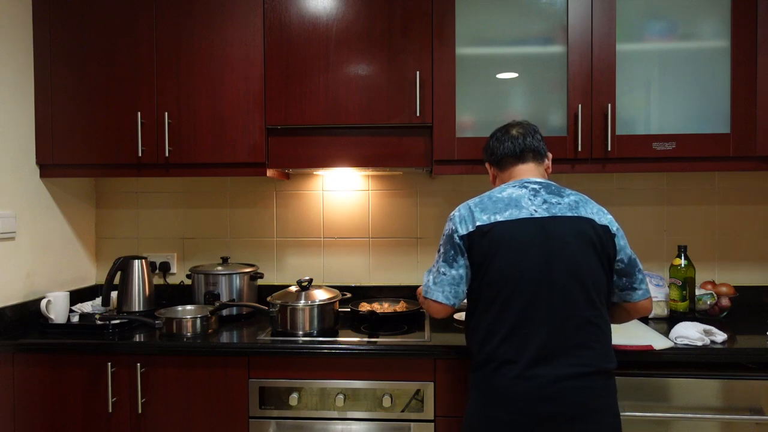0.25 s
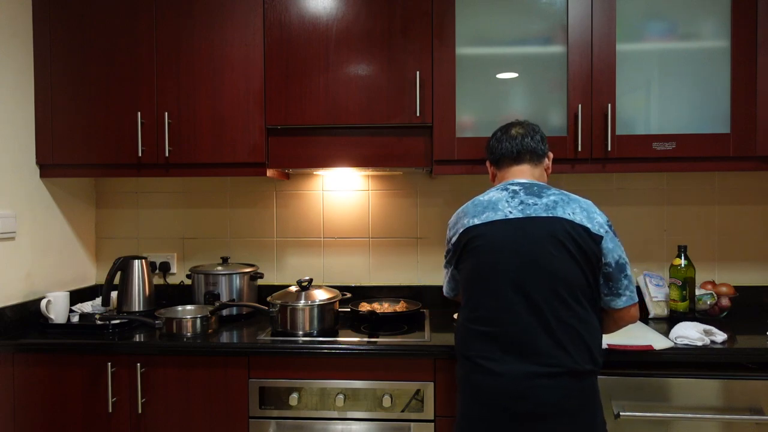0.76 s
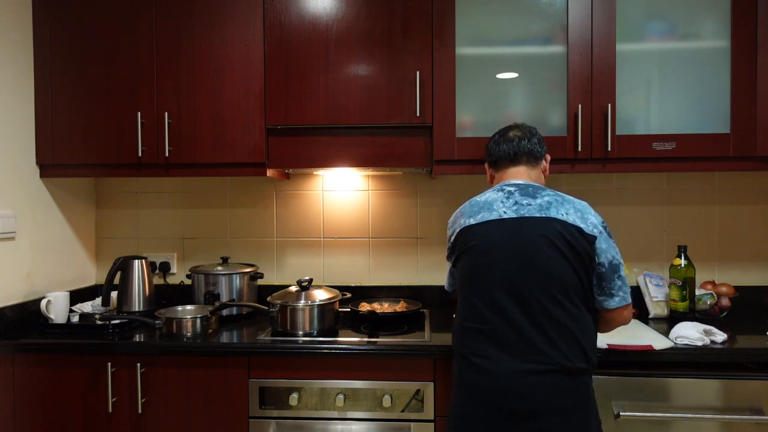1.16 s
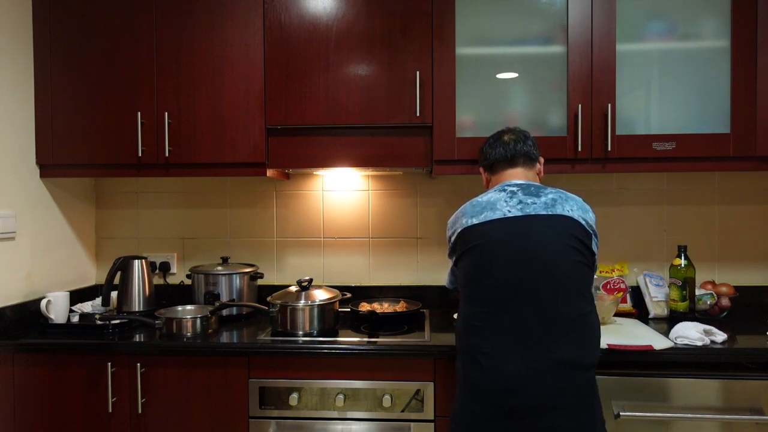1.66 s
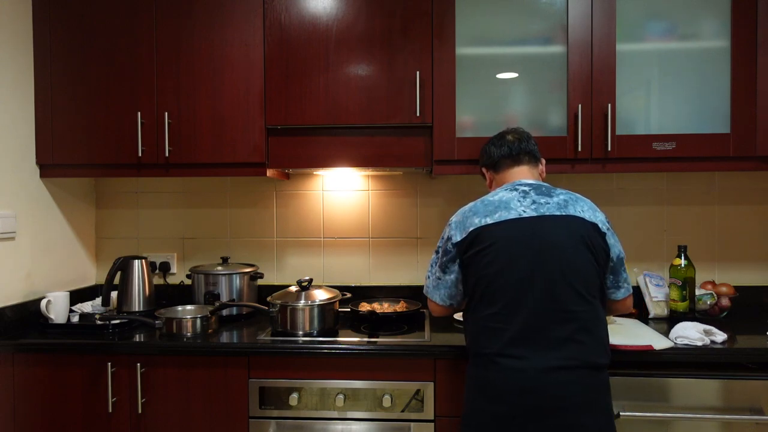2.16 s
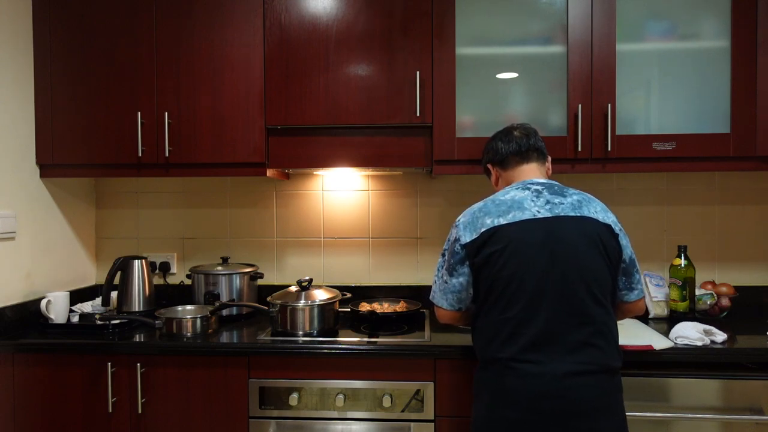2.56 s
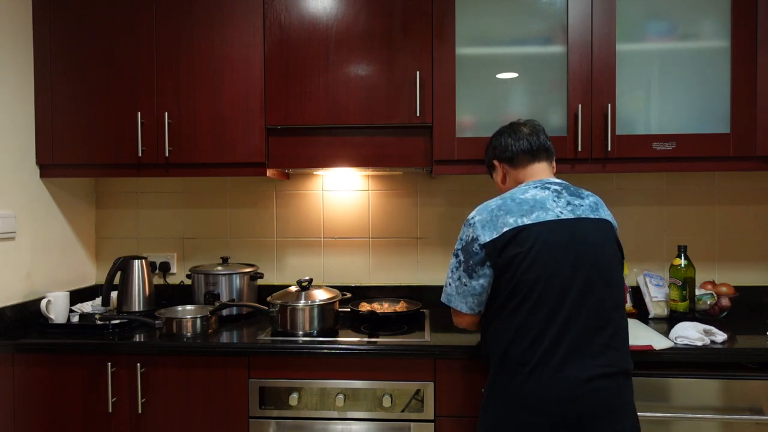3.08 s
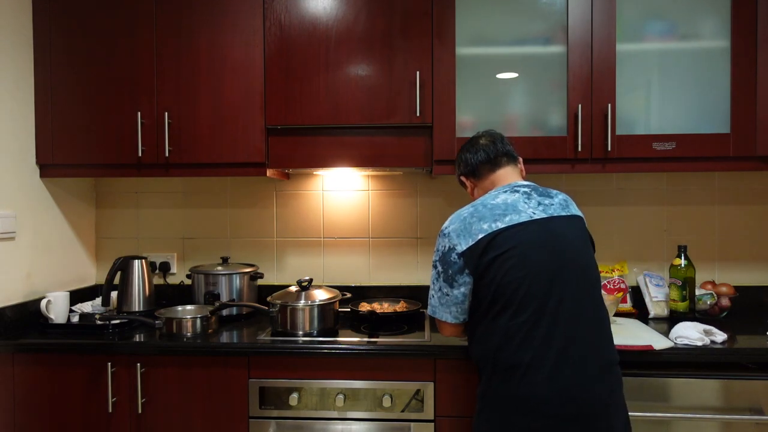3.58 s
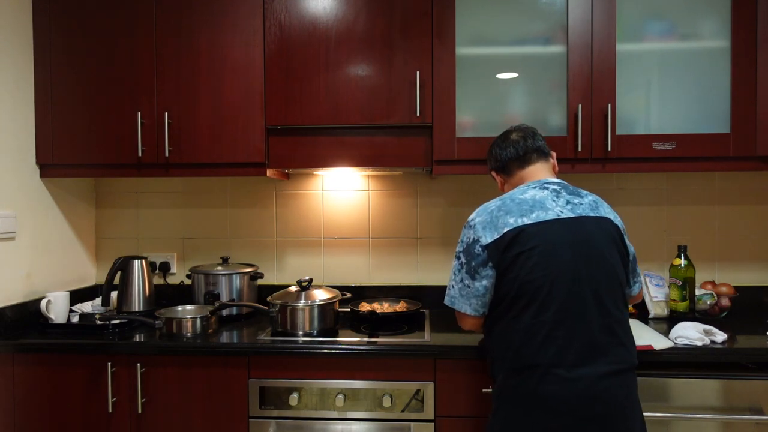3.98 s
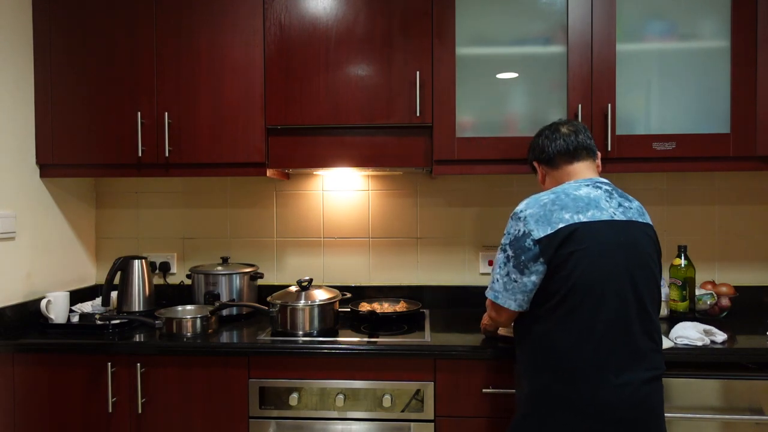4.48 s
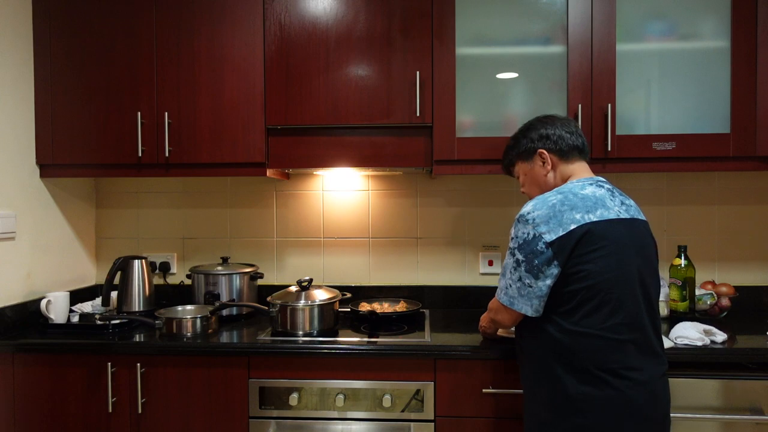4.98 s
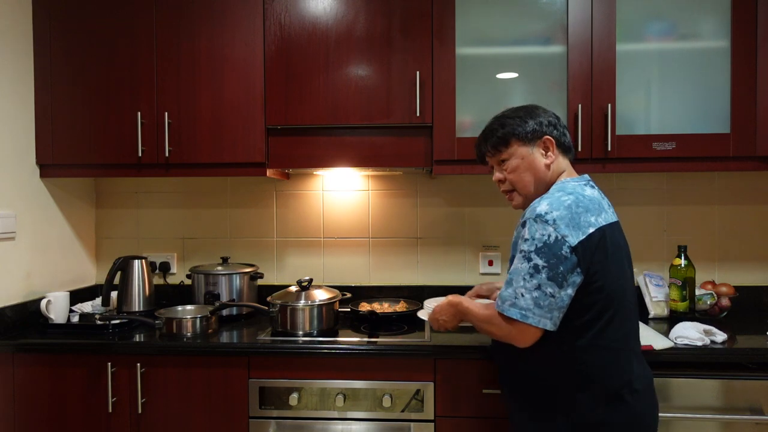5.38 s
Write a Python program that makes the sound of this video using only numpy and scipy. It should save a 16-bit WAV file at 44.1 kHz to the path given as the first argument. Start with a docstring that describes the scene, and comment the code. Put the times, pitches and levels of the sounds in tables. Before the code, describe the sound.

Faint sizzling and a low hum run throughout in a hard, echoing kitchen, heard in stereo and indirectly, through reflections. After soft hand scuffs, a metal lid taps at 0.7 seconds and a pot knocks on a stone counter around 0.9 to 1.1. The pot and lid clank loudly at 1.2 and 1.3 seconds, and the pot clanks hard again at 1.7. Each rings briefly, with echo swelling behind it, and the sizzle dips for a moment afterward. From 2.6 to 2.8 seconds a pan is set down with a softer, quick clatter. A scuff comes near 3.1, then a light clink on a bowl at 3.5. A spoon knocks on the bowl several times between 4.2 and 4.7 seconds, loudest near 4.55. A tiny, low tap follows at 5 seconds, then soft scuffs over the sizzle until about 5.6.

```python
"""Clanks ring out in a hard, echoing kitchen: a lid, a pot and a pan are set down on a stone counter,
then a spoon knocks on a bowl, while food sizzles faintly and hands scuff. Each impact excites the
object's modes: dense, short-lived ones clatter and clear ones ring, all heard by way of the room.
A limiter flattens each loud clank, so the echo swells up behind it; after the long run of clanks
it stays down for a moment and the sizzle sinks."""
import sys
import numpy as np
from scipy import signal
from scipy.fft import rfft, irfft
from scipy.io import wavfile
from scipy.ndimage import uniform_filter1d, minimum_filter1d

SR = 44100
rng = np.random.default_rng(int(sys.argv[2]) if len(sys.argv) > 2 else 0)


def bounce(signal):
    """Save signal as a 16-bit WAV file at the path given by the first command-line argument."""
    frames = np.transpose(np.atleast_2d(signal))
    limited = np.clip(frames, -1, 1)
    pcm = np.round(limited * 32767).astype(np.int16)
    wavfile.write(sys.argv[1], SR, pcm)


N = 248841
SIZE = 49152  # samples in one impact with its echo
T = np.arange(SIZE) / SR
HZ = np.fft.rfftfreq(SIZE, 1 / SR)


def gain_of(db):
    """The decibel scale: 20 dB is a factor of ten in amplitude."""
    return 10 ** (np.asarray(db) / 20)


def rms(x):
    """Effective amplitude: the root of the mean square."""
    return np.sqrt(np.mean(x ** 2) + 1e-20)


def curve_at(points, hz):
    """Interpolation on a logarithmic frequency axis."""
    points_hz, values = np.transpose(points)
    return np.interp(np.log(hz + 1), np.log(points_hz + 1), values)


def decay(t, t60):
    """Exponential damping: the amplitude falls 60 dB in t60 seconds."""
    return np.exp(-np.log(1000) * t / t60)


def minimum_phase(db):
    """Causality: a filter with this gain on HZ and no response before the blow."""
    log_gain = np.log(gain_of(np.r_[db, db[-2:0:-1]]))
    return np.exp(np.conj(signal.hilbert(log_gain)))[:len(db)]


def at_level(spectrum, db):
    """Normalisation: the waveform whose mid channel has this level over its first 50 ms."""
    sound = irfft(spectrum)
    return gain_of(db) * sound / rms(sound[0, :SR // 20])


def add(mix, start_s, sound):
    """Superposition: a sound adds to the mix from start_s on."""
    part = mix[:, max(round(start_s * SR), 0):][:, :SIZE]
    part += sound[:, :part.shape[1]]


# Width of the sound at two microphones: frequency_hz, side_to_mid_db
STEREO_WIDTH = [(100, -20), (250, -20), (500, -15), (1000, -11), (2000, -9.7), (4000, -8.5), (12000, -8.5)]
def mid_side_gains(hz):
    """Spatial coherence: long waves reach both microphones alike, so the bass has little side signal."""
    return gain_of([0 * hz, curve_at(STEREO_WIDTH, hz)])


# Spectrum of the sizzle and room hum: frequency_hz, relative_density_db
SIZZLE_SPECTRUM = [(18, -57), (30, -35), (178, 1.5), (301, -2), (496, -13), (645, -5.5), (931, -11),
                   (1060, -9.5), (1490, -12), (3030, -11.5), (3450, -8.5), (6830, -6.5), (15800, -13.5)]
def sizzle_and_hum(level_db=-54.5, spits_per_s=250, spit_size=6.4, spit_hz=3500):
    """Shot noise: tiny random spits of hot oil add treble to a steady hiss and hum."""
    hz = np.fft.rfftfreq(N, 1 / SR)
    spits = spit_size * rng.laplace(size=(2, N)) * (rng.random(N) < spits_per_s / SR)
    noise = rfft(rng.standard_normal((2, N))) + rfft(spits) * hz / (hz + spit_hz)
    sound = irfft(noise * gain_of(curve_at(SIZZLE_SPECTRUM, hz)) * mid_side_gains(hz), N)
    return sound / rms(sound[0]) * gain_of(level_db)


# Reverberation time of the kitchen: frequency_hz, t60_s
REVERB_TIMES = [(150, .66), (400, .66), (1000, .7), (2700, .72), (6000, .63), (10000, .52), (15000, .42)]
def kitchen(early_boost=0.5, early_t60_s=0.26, build_s=0.0021):
    """Diffuse reverberation: the cook's body hides the direct path, so reflections carry it all."""
    hz, t, bands = signal.stft(rng.standard_normal((2, SIZE)), SR, nperseg=256)
    tail = signal.istft(bands * decay(t, curve_at(REVERB_TIMES, hz)[:, None]), SR)[1][:, :SIZE]
    early = 1 + early_boost * decay(T, early_t60_s)  # the tiles and counter answer first
    build_up = 1 - np.exp(-T / build_s)
    return rfft(tail * early * build_up) * mid_side_gains(HZ)


def contact(t60, density=0.08, impulse=1.47):
    """Impulsive excitation: the spectrum of one sharp touch and a dying chatter of tiny ones."""
    chatter = rng.standard_normal(SIZE) * (rng.random(SIZE) < density) * decay(T, t60)
    return impulse + rfft(chatter) / np.linalg.norm(chatter)


# Soft hand scuffs and, at 5.033 s, the short, low ring of the last light tap on the bowl:
# start_s, level_db, centre_hz, width_octaves, t60_s
LIGHT_TOUCHES = [(0.0, -54.5, 807, 1.3, 0.29), (.484, -54.5, 5030, 0.25, 0.02),
                 (0.586, -59, 5330, 0.58, 0.034), (3.081, -50, 4260, 0.86, 0.47),
                 (4.10, -55, 890, 1.2, 0.48), (4.399, -50, 730, 1.9, 0.11), (5.033, -45, 707, 0.057, 0.069),
                 (5.281, -54, 4140, 1.1, 0.81), (5.543, -53, 2240, 0.87, 0.76)]
def light_touches():
    """Resonance: a chatter of contacts sounds as a scuff in a broad band and rings in a narrow one."""
    mix = np.zeros((2, N))
    for start_s, level_db, centre_hz, octaves, t60 in LIGHT_TOUCHES:
        resonance_db = -20 * np.log10(1 + (np.log2((HZ + 1) / centre_hz) / octaves) ** 2)
        add(mix, start_s, at_level(kitchen() * contact(t60) * minimum_phase(resonance_db), level_db))
    return mix


def mode_spectra(modes, t60, damping_slope=0.17, split=0.01, count=4):
    """Mode splitting: an uneven rim turns each mode into close partners that beat as they decay."""
    hz = np.array(modes)[:, :1]
    t = T[:SIZE // 2]
    offsets = np.linspace(-1, 1, count)[:, None, None] + 0.11 * rng.uniform(-1.2, 1, (count, *hz.shape))
    partner_hz = hz * (1 + split * offsets)
    waves = np.sin(2 * np.pi * (partner_hz * t + rng.random(partner_hz.shape))).sum(0)
    mode_t60 = t60 * (2000 / hz) ** damping_slope  # high modes die sooner
    radiation = 1j * HZ / (1j * HZ + hz / 2)  # thin metal radiates little below its modes
    return radiation * rfft(waves * decay(t, mode_t60), SIZE)


# Clear, ringing modes: pitch_hz, then relative_level_db for each place struck
LID = [(370, -36, -28), (904, -21, -20), (1205, -10, -17), (1367, -36, -14), (1679, -40, -19),
       (1810, -33, -17), (2067, -5, -25), (2137, -26, -13), (2239, -33, -18), (2440, -34, -21),
       (2610, -34, -21), (2939, -15, -15), (3477, -15, -29), (3875, -12, -12), (4231, -25, -36),
       (4425, -39, -25), (5243, -12, -14), (5383, -15, -21), (6879, -17, -23), (7041, -14, -27),
       (7375, -41, -27), (8301, -23, -19), (8871, -21, -24), (8947, -28, -24), (9603, -32, -20),
       (10992, -34, -27), (11531, -28, -28), (12618, -41, -29), (13242, -30, -28), (14240, -37, -37),
       (15220, -34, -44)]
POT = [(425, -26, -26, -27), (581, -18, -20, -28), (872, -18, -22, -14), (1022, -16, -14, -17),
       (1464, -26, -22, -14), (1614, -13, -20, -26), (1690, -19, -12, -29), (1981, -31, -19, -31),
       (2077, -18, -32, -31), (2444, -19, -10, -24), (2594, -18, -22, -18), (2810, -15, -14, -30),
       (3348, -32, -26, -21), (3606, -26, -24, -35), (3692, -37, -39, -18), (4963, -28, -20, -21),
       (5404, -28, -25, -23), (5867, -43, -24, -40), (6158, -32, -21, -33), (7741, -27, -28, -34),
       (8118, -42, -32, -25), (9711, -35, -45, -29), (10766, -31, -54, -29)]
PAN = [(559, -20), (904, -20), (1399, -13), (1658, -17), (2056, -16), (2583, -22), (3197, -21), (4026, -18),
       (5340, -24), (5437, -23), (6093, -27), (7149, -24), (8311, -27), (9625, -32)]
BOWL = [(1453, -33, -32, -20), (1550, -38, -33, -16), (1625, -29, -27, -18), (2508, -36, -17, -12),
        (3391, -3, -9, -15), (3714, -36, -14, -27), (3822, -35, -33, -21), (4844, -26, -26, -31),
        (5221, -14, -30, -26), (5566, -18, -18, -32), (6212, -45, -24, -31), (7256, -40, -35, -25),
        (7913, -17, -28, -23), (8118, -21, -16, -31), (9377, -32, -34, -44), (9560, -30, -47, -34),
        (10346, -20, -19, -27), (10669, -29, -29, -25), (11294, -46, -32, -38), (13124, -25, -23, -34)]
SPOON = [(947, -15), (1421, -13), (1507, -10), (3262, -17), (3391, -13), (5598, -18), (5695, -15)]
# Clatter of dense, short-lived modes: frequency_hz, then relative_density_db for each place struck
LID_BODY = [(95.3, -34.5, -28), (170, -20, -22), (302, -15, -19), (447, -12, -0.5), (650, -0.5, -3),
            (990, 10, 4), (1250, -8.5, -14), (1710, -19.5, 7), (2585, -19, -4), (3430, -3.5, -5),
            (5400, -13, -13), (8000, -25, -54.5), (11800, -41, -26.5), (15300, -35, -40.5)]
POT_BODY = [(90, -39, -58.5, -48), (169, -35.5, -13.5, -17.5), (323, -48.5, -3, -14.5),
            (445, -29, -26, -21), (637, 5, 6, -5), (920, 15.5, 12, 3.5), (1220, 0, 12, 1.5),
            (1820, -0.5, -19, -6.5), (2660, -21.5, -2, -4.5), (3500, -9.5, -3.5, -13),
            (5840, -14.5, -9.5, -14.5), (7950, -17.5, -18.5, -13.5), (11900, -23.5, -29, -21.5),
            (15200, -31, -45.5, -22.5)]
PAN_BODY = [(90, -27.5), (170, -22.5), (300, -12.5), (450, -9.5), (700, -5), (950, -7), (1250, -1.5),
            (1700, 0), (2500, -6), (3600, -8.5), (5500, -12.5), (8000, -14.5), (11000, -25), (15000, -34.5)]
BOWL_BODY = [(89, -35, -49, -47), (170, -27, -21.5, -35), (300, -39, -17.5, -26.5),
             (472, -14.5, -10, -18.5), (707, -18, 3.5, 0), (980, -7, -2, -3), (1140, -6.5, -10.5, -7.5),
             (1740, 6, 7, 1.5), (2660, 1.5, -0.5, -6.5), (3330, 9, 3, 0.5), (5400, -4, -2.5, -6),
             (7900, -5.5, -5.5, -7), (10900, -5, -9.5, -9), (15000, -15, -7.5, -21.5)]
SPOON_BODY = [(90, -46), (300, -70), (650, -51), (950, 15.5), (1150, -22), (1500, 16.5), (1800, 5),
              (2300, -3), (3300, 7), (4500, -5.5), (5700, 7), (8000, -23), (15000, -48)]
# Each vibrating object: modes, clatter, ring_t60_s at 2 kHz
OBJECTS = {"lid": (LID, LID_BODY, 0.056), "pot": (POT, POT_BODY, 0.052), "pan": (PAN, PAN_BODY, 0.092),
           "bowl": (BOWL, BOWL_BODY, 0.071), "spoon": (SPOON, SPOON_BODY, 0.078)}
# Places struck, in the order of the level columns above: ring_over_clatter_db, bass_db
STRIKE_PLACES = {"lid": {"rim": (8, -8), "face": (1, -2)}, "pot": {"base": (0, -15), "wall": (-2, -3),
                 "rim": (-4, -1)}, "pan": {"base": (-6, -2)}, "bowl": {"rim": (7, 2), "wall": (1.5, 2),
                 "base": (-5.5, 3)}, "spoon": {"tip": (-4, -10)}}
# Impacts: start_s, object, place, clatter_level_db, hardness_db (treble gain), chatter_t60_s
IMPACTS = [ (0.728, "lid", "rim", -15, 3, 0.017), (0.895, "pot", "base", -9, 8.5, 0.12),
           (0.988, "pot", "base", -15, 5, 0.016), (1.086, "pot", "base", -20, -20.5, 0.018),
           (1.240, "pot", "wall", 0.5, 9.5, 0.11), (1.333, "lid", "face", 2, 8, 0.14),
           (1.724, "pot", "rim", -0.5, 0, 0.093), (1.785, "pot", "rim", -13, -5, 0.058),
           (2.595, "pan", "base", -20, 3.5, 0.26), (2.621, "pan", "base", -19, -0.5, 0.17),
           (2.680, "pan", "base", -17.5, -7, 0.017), (2.779, "pan", "base", -23, 0, 0.15),
           (3.319, "spoon", "tip", -55.5, 10.5, 0.16), (3.432, "spoon", "tip", -40.5, -20, 0.019),
           (3.518, "bowl", "rim", -26.5, -1.5, .02), (4.178, "bowl", "wall", -14.5, 0.5, 0.15),
           (4.245, "bowl", "wall", -22.5, -11.5, 0.022), (4.440, "bowl", "base", -34.5, -18, 0.21),
           (4.553, "bowl", "base", -6, -3.5, 0.22), (4.640, "bowl", "wall", -19, -3.5, 0.043),
           (5.032, "bowl", "base", -36.5, -8.5, 0.031), ]
def cookware(bass_hz=800, treble_hz=5000, thud_db_per_db=0.19):
    """Modal response to impact: each blow clatters and rings; a hard one is bright, a soft one thuds."""
    mix = np.zeros((2, N))
    spectra = {name: mode_spectra(modes, t60) for name, (modes, _, t60) in OBJECTS.items()}
    powers = {name: abs(spectrum) ** 2 for name, spectrum in spectra.items()}
    bass_shelf = 1 / (1 + (HZ / bass_hz) ** 4)
    treble_shelf = 1 - 1 / (1 + (HZ / treble_hz) ** 3)
    for start_s, name, place, level_db, hardness_db, chatter_t60 in IMPACTS:
        modes, body, _ = OBJECTS[name]
        column = 1 + list(STRIKE_PLACES[name]).index(place)
        ring_db, bass_db = STRIKE_PLACES[name][place]
        path = kitchen() * contact(chatter_t60)
        body_db = curve_at(np.array(body)[:, [0, column]], HZ)
        thud_db = bass_db - thud_db_per_db * hardness_db
        clatter = minimum_phase(body_db + thud_db * bass_shelf + hardness_db * treble_shelf)
        path_gains = np.sqrt(powers[name] @ abs(path[0]) ** 2)
        amplitudes = gain_of(np.array(modes)[:, column]) / path_gains  # mode balance holds on arrival
        ring = (amplitudes * rng.choice([-1, 1], len(modes))) @ spectra[name]
        add(mix, start_s, at_level(path * clatter, level_db) + at_level(path * ring, level_db + ring_db))
    return mix


def scene():
    """Mid-side stereo: the sources add, then sum and difference give left and right."""
    mid, side = cookware() + light_touches() + sizzle_and_hum()
    return np.array([mid + side, mid - side])


def limiter(sound, threshold_db=-17, ratio=4.73, release_db_per_s=63.5,
            memory_s=1.148, hold_share=1.24, hold_max_db=9.5, overshoot=0.38, settle_s=0.041):
    """Compression: the gain drops at once, recovers steadily and stays partly down after long overload."""
    power = abs(uniform_filter1d((sound ** 2).mean(0), size=128))
    needed_db = np.maximum(10 * np.log10(power + 1e-12) - threshold_db, 0) * (1 - 1 / ratio)
    t = np.arange(N) / SR
    release_db = t * release_db_per_s
    cut_db = np.maximum.accumulate(needed_db + release_db) - release_db
    cut_integral = np.cumsum(cut_db) / SR
    recent_db = (cut_integral - np.interp(t - memory_s, t, cut_integral)) / memory_s
    held_db = np.minimum(hold_share * recent_db, hold_max_db)  # this ducks the sizzle too
    cut_db = np.maximum(cut_db, held_db)
    pole = np.exp(-1 / (settle_s * SR))
    settled_db = signal.lfilter([1 - pole], [1, -pole], cut_db)
    cut_db += overshoot * np.maximum(cut_db - settled_db, 0)  # a sudden clank is clamped too hard at first
    smooth_gain_db = uniform_filter1d(minimum_filter1d(-cut_db, size=64), size=64)
    return sound * gain_of(smooth_gain_db)


def record(dry, low_cut_hz=95, high_cut_hz=16000):
    """Band limiting: a high-pass filter comes before the limiter and a steep low-pass after it."""
    high_pass = signal.butter(3, low_cut_hz, "highpass", fs=SR, output="sos")
    low_pass = signal.firwin(511, high_cut_hz, window=("kaiser", 9), fs=SR)
    limited = limiter(signal.sosfilt(high_pass, dry))
    return signal.oaconvolve(limited, low_pass[None], "same")


dry = scene()
out = record(dry)
bounce(out)
```